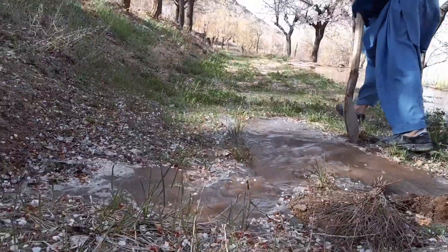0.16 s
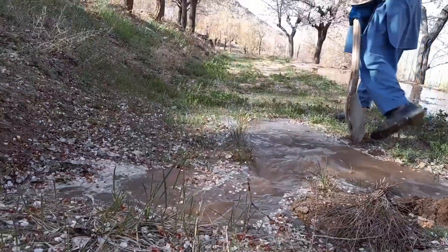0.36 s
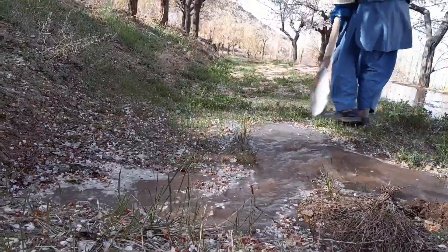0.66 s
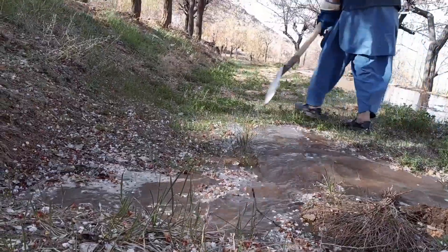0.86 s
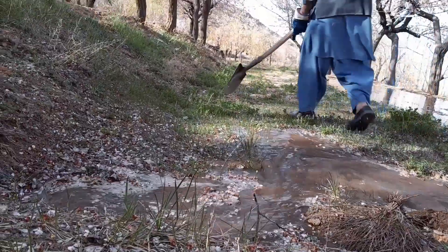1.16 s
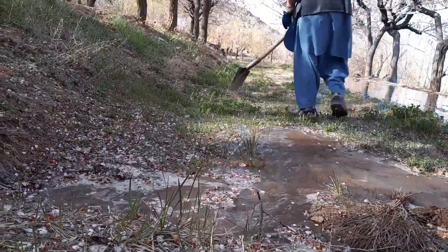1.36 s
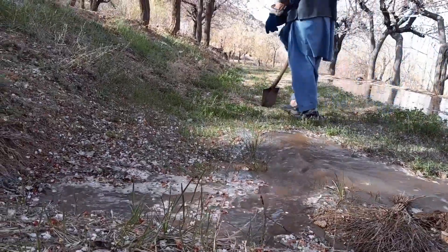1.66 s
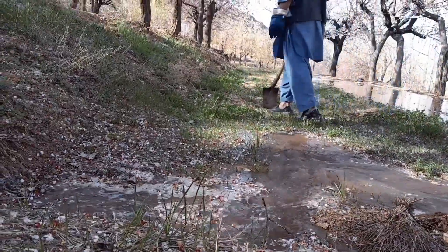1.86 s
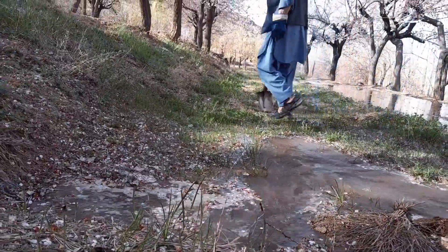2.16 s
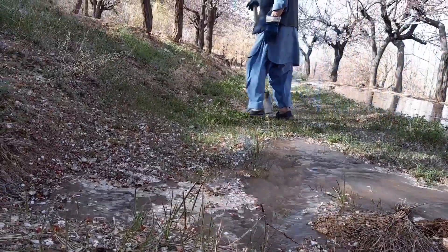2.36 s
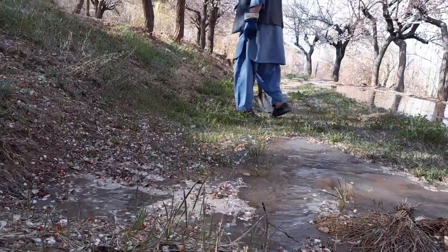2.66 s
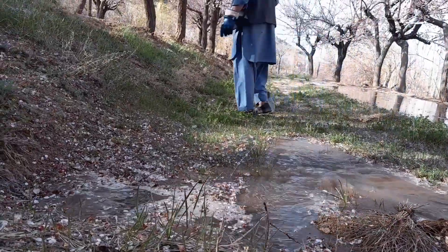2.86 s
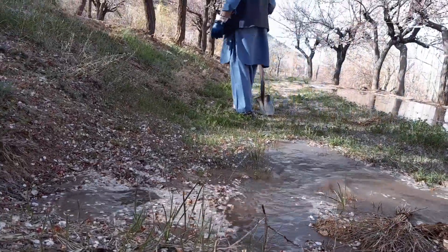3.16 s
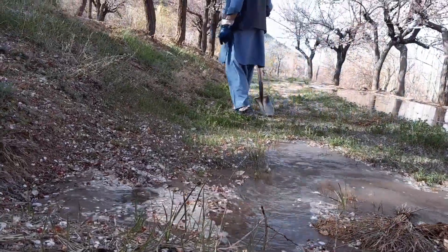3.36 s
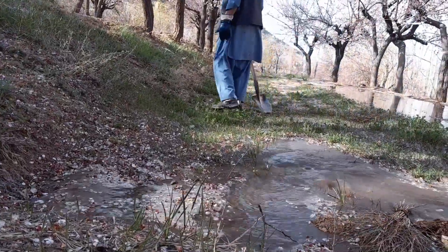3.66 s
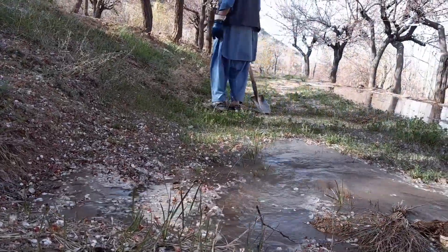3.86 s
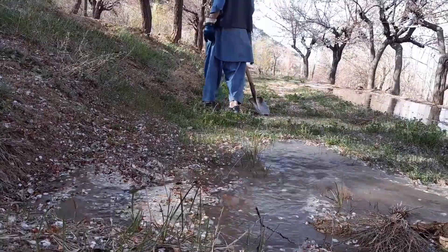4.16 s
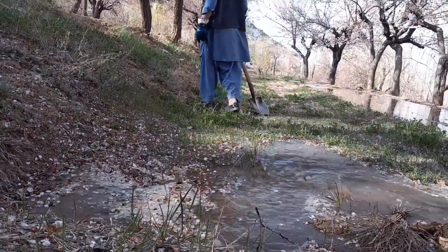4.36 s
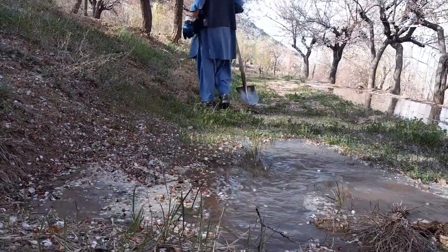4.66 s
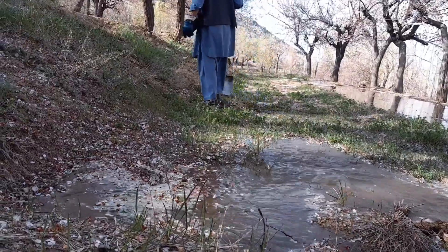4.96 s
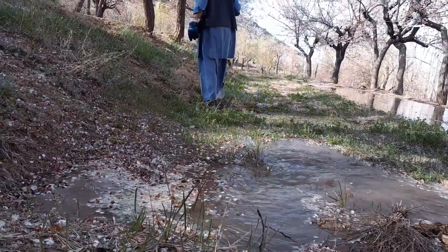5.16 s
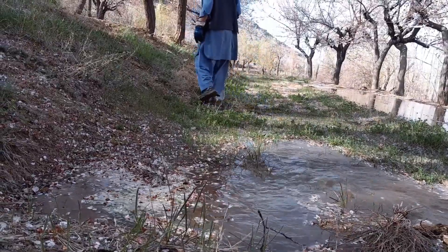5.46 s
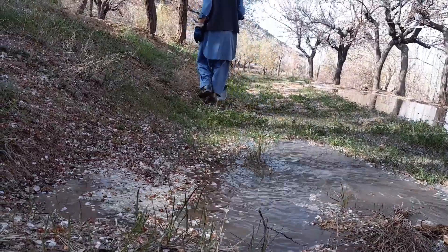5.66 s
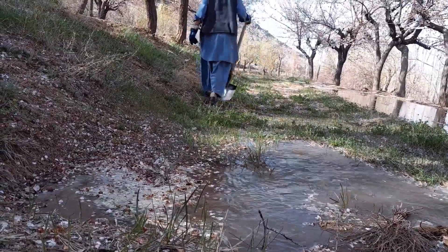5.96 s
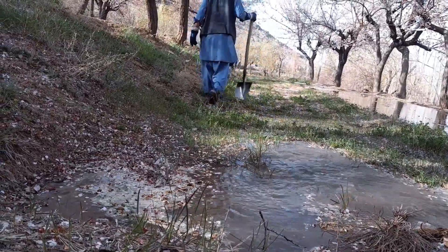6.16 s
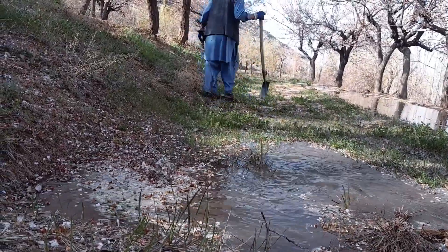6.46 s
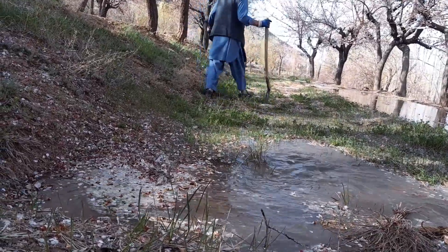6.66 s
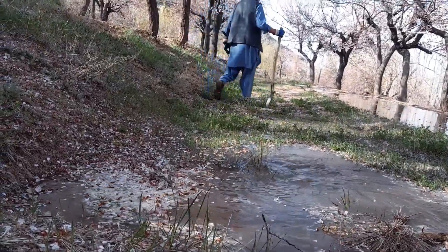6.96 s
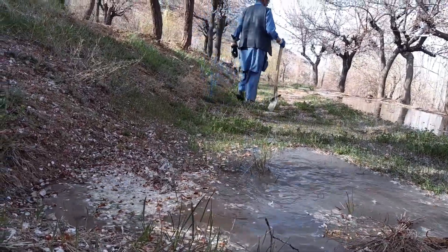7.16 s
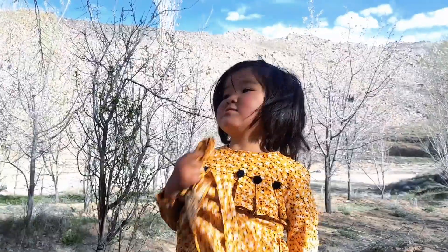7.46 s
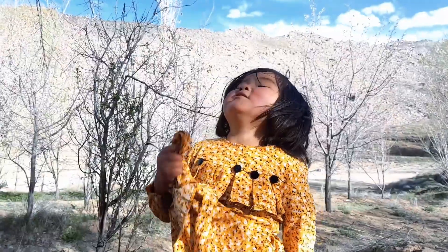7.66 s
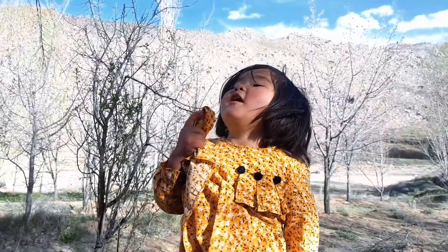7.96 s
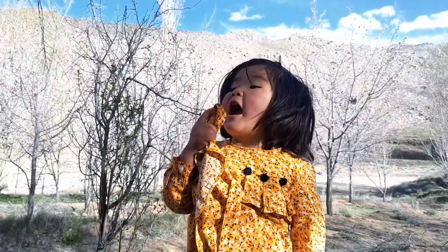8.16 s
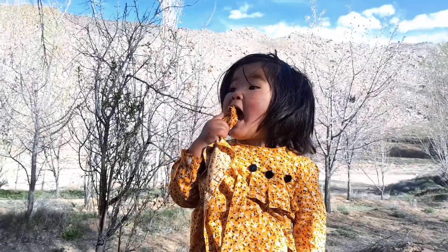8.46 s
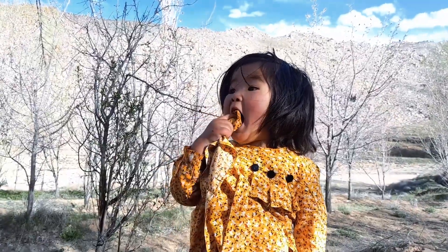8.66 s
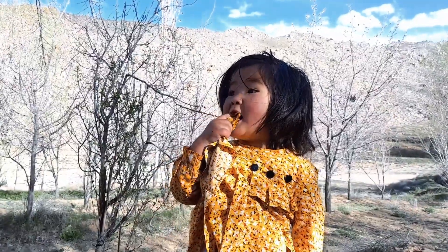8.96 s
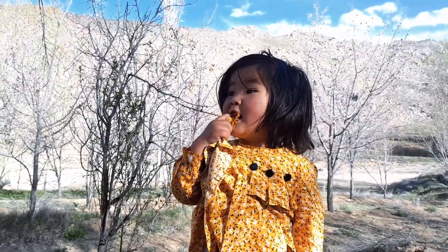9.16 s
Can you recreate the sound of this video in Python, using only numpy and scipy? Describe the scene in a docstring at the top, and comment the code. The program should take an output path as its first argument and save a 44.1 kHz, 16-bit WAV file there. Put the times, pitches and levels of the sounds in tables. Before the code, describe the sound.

Muddy irrigation water rushes and gurgles steadily with fizzing spray and small splashes, then cuts abruptly to a quiet breeze and faint hiss outdoors.

```python
"""A stream churns and glugs low down while spray and bursting bubbles fizz above, reaching the left port first.
It is irrigation water pouring through an opened ditch bank over leafy ground: ringing bubbles mixed with noise.
The scene then switches abruptly to a quiet orchard: a light breeze on the microphone and a thin hiss on the left.
The breeze is coloured noise with slow and random level changes, and its puffs are short dying throbs."""
import sys
import numpy as np
from scipy import signal
from scipy.fft import rfft, irfft
from scipy.io import wavfile

SR = 44100
rng = np.random.default_rng(int(sys.argv[2]) if len(sys.argv) > 2 else 0)


def wrap_up_sound(samples):
    """Save the sound to the file named by the first command line argument, as 16-bit audio."""
    columns = np.atleast_2d(samples).T
    # keep every value between -1 and 1, then stretch to whole-number steps
    tamed = np.clip(columns, -1, 1)
    steps = np.round(tamed * 32767).astype(np.int16)
    wavfile.write(sys.argv[1], SR, steps)


N = 410571
HZ = np.fft.rfftfreq(N, 1 / SR)
T = np.arange(N) / SR  # seconds

# the nearly steady flow of water, which only drifts: time_s, strength_db
FLOW_DRIFT = [(0, -0.5), (.2, -0.5), (.6, 0), (1.1, 0.36), (1.9, -0.2), (2.3, 0.1), (3.2, -0.5),
              (3.45, 0.5), (3.75, 0.7), (4.5, 0.5), (4.75, 0.25), (5.7, 0), (6.3, 0.3), (6.5, 1.4),
              (6.8, 1.5), (7.15, -0.3)]
# relative spectrum of the finest droplets and of slaps on the surface: frequency_hz, density_db (per Hz)
DROPLET_SPECTRUM = [(1500, -27), (4000, -7), (7500, 5), (9800, -0.5), (11000, 0), (13000, -1.5),
                    (15300, -12)]


def churn(gain_db=-33.5, follows_flow=0.84, follows_surge=0.3, lumpy_db=-0.4):
    """Air entrainment: water tumbling through the gap folds in large pockets of air, which ring low."""
    # relative spectrum of the deep churn: frequency_hz, density_db (per Hz)
    spectrum = [(20, -30), (45, -7.5), (62, 1), (90, -2), (130, 1.5), (165, 0), (210, -5.5), (290, -15.5),
                (500, -56)]
    glugs = bubbles(low_hz=80.0, high_hz=301, per_s=120, cycles=2.97, rise=0.049, spread_db=-0.5, count=12)
    froth = frothing(glugs, bubble_db=-17.5)
    body = evened(coloured(froth, read(spectrum)))
    drift_db = follows_flow * curve(FLOW_DRIFT) + follows_surge * surge_db()
    return amp(gain_db + drift_db + lumpy_db * wander(rate_hz=36)) * body


def gurgle(gain_db=-33.0, follows_surge=0.37, lumpy_db=0.78):
    """Bubble resonance: smaller pockets burble at higher pitches where the stream spreads out."""
    # relative spectrum of the burble: frequency_hz, density_db (per Hz)
    spectrum = [(130, -23), (200, 0.5), (250, -1), (310, -2), (370, 1.2), (420, -3), (480, -6.5),
                (620, -7.5), (700, -9.8), (790, -14.5), (930, -10), (1070, -15), (1240, -10), (1420, -18.5),
                (2400, -46)]
    glugs = bubbles(low_hz=218.1, high_hz=1114, per_s=500, cycles=7.1, rise=0.035, spread_db=1.5, count=18)
    froth = patchy(frothing(glugs, bubble_db=-8.5), depth_db=0.5, wide_hz=150, long_s=0.19)
    body = evened(coloured(froth, read(spectrum)))
    return amp(gain_db + follows_surge * surge_db() + lumpy_db * wander(rate_hz=21)) * body


def surge_db():
    """Superposed sloshes: each rolls through the gap as a smooth hump of level, or leaves a lull behind it."""
    # sloshes and lulls: middle_s, change_db
    sloshes = [(.35, 6.5), (.53, -3.5), (.76, 5), (1.24, 0), (1.45, -3.5), (1.78, -1), (2.04, -0.5),
               (2.3, 5), (2.59, -2), (3.8, 5), (4.5, 4), (4.95, -6), (5.13, 3), (5.44, 2), (5.57, -4.5),
               (5.9, 2), (6.12, -4), (6.6, 3.5)]
    half_s = 0.08  # from the middle to 1/e of the change
    return sum(db * np.exp(-((T - s) / half_s) ** 2) for s, db in sloshes)


def spray(gain_db=-33.0, spurt_db=0.84, swell_db=0.24, tinkle_db=-12):
    """Bursting bubbles: tiny ones spurt where water breaks over stones and twigs; a few ring longer."""
    pops = bubbles(low_hz=1292, high_hz=13800, per_s=3500, cycles=3.7, rise=0.037, spread_db=2.5, count=22)
    froth = frothing(pops, bubble_db=-4.0) + amp(tinkle_db) * tinkles()
    froth = patchy(froth, depth_db=1.05, wide_hz=700, long_s=0.022)
    swell = wander(rate_hz=10.7)
    level_db = gain_db + curve(FLOW_DRIFT) + spurt_db * wander(rate_hz=43) + swell_db * swell
    return amp(level_db) * evened(coloured(froth, spray_colour())) + prickle()


def spray_colour():
    """Cavity resonance: the microphone ports lift the spray's spectrum (in dB) around their modes."""
    # relative spectrum of the spray: frequency_hz, density_db (per Hz)
    spectrum = [(700, -41), (1000, -11), (1250, -4.5), (1700, -4), (2400, -3.5), (3200, -0.5), (5500, -1),
                (7600, 0.1), (8900, -12), (11000, -10.5), (12500, -14), (15300, -18)]
    # resonances of the microphone ports: frequency_hz, width_hz, lift_db
    port_modes = [(4290, 790, 5.5), (6630, 870, 5)]
    lift_db = sum(db / (1 + (2 * (HZ - hz) / width) ** 2) for hz, width, db in port_modes)
    return read(spectrum) + lift_db


def tinkles(low_hz=1100, high_hz=7000, per_s=170, cycles=20, rise=0.0246, spread_db=5):
    """Lightly damped bubbles: each rings long on its own pitch, rising as it nears the surface."""
    out = np.zeros((3, N))
    for place, when, pitch, size in rng.random((int(3 * per_s * N / SR), 4)):
        hz = low_hz * (high_hz / low_hz) ** pitch
        age = np.arange(0, 4, hz / (cycles * SR))  # in decay times
        ring = np.exp(-age) * np.sin(2 * np.pi * cycles * (age + rise * age ** 2 / 2))
        ring *= np.sqrt(hz) * amp(spread_db * size)
        part = out[int(place * len(out)), int(when * N):][:len(age)]  # a view into out
        part += ring[:len(part)]
    return evened(out)


def prickle(gain_db=-49.0, follows_flow=0.8, shower_db=3.5):
    """Impact ringing: fine droplets fall back in brief showers, each with a short high ring."""
    ticks = bubbles(low_hz=6600, high_hz=15000, per_s=2000, cycles=4.2, rise=0, spread_db=3.0, count=6)
    body = evened(coloured(ticks, read(DROPLET_SPECTRUM)))
    return amp(gain_db + follows_flow * curve(FLOW_DRIFT) + shower_db * wander(rate_hz=22)) * body


def gulps(gain_db=-6):
    """Volume pulsation: a large air pocket collapses and throbs for a few damped cycles."""
    # large air pockets, level before gain_db: start_s, level_db, pitch_hz
    pockets = [(.34, -17.5, 378), (.69, -16, 151), (.815, -18, 355), (1.187, -17, 370), (1.21, -16, 147),
               (1.214, -22, 594), (1.303, -15, 145), (1.58, -17, 75), (1.922, -14, 108),
               (2.193, -14.5, 154), (2.297, -16.5, 148), (2.318, -21.5, 552), (2.483, -18.5, 332),
               (3.348, -19.5, 347), (3.602, -16, 149), (3.809, -17.5, 156), (3.817, -22, 370),
               (4.263, -20, 390), (4.497, -12.5, 158), (5.373, -16, 115), (5.483, -20, 354),
               (5.703, -14.5, 136), (5.907, -13.5, 156), (6.396, -20.5, 398), (6.582, -17, 128),
               (6.587, -18.5, 328), (6.919, -16, 136)]
    return amp(gain_db) * throbs(pockets, decay_s=0.0052)


def splashes(slap_s=0.003, ring_db=-1, slap_db=-20):
    """Impact and resonance: a near drop slaps the surface and its bubble pings; a spatter is many slaps."""
    # single near drops, level before ring_db or slap_db: start_s, level_db, pitch_hz
    near_drops = [(0.049, -18.5, 6400), (0.6185, -24, 6600), (1.0211, -29, 4190), (1.062, -22, 6600),
                  (2.0093, -23, 6820), (2.1929, -21, 6310), (2.4687, -23, 4560), (4.4019, -24, 6700),
                  (4.6478, -26, 6750), (6.4647, -22, 6600), (6.566, -25, 6600)]
    # brief bright spatters: start_s, level_db, decay_s
    bright_spatters = [(1.249, -35, .002), (1.531, -33, 0.0046), (1.776, -39, .012), (2.1928, -31, .0014),
                       (3.572, -38, 0.0028), (3.637, -39, .003), (3.9803, -31, .001), (4.119, -36, .004),
                       (4.475, -34, .004), (5.783, -36, .003), (6.66, -36, .007)]
    slaps = sum(amp(db + slap_db) * pulse(s, slap_s) for s, db, _ in near_drops)
    spatters = sum(amp(db) * pulse(s, decay_s) for s, db, decay_s in bright_spatters)
    fizz = evened(coloured(rng.standard_normal(N), read(DROPLET_SPECTRUM)))
    pings = amp(ring_db) * throbs(near_drops, decay_s=0.00089)
    return pings + (slaps + spatters) * fizz


def stream():
    """Spatial coherence: the wide flow is diffuse, while single gulps and splashes come from one spot."""
    # likeness of the wide water at the two ports: frequency_hz, likeness (0-1)
    likeness = [(25, .35), (60, .76), (130, .96), (370, .99), (1100, .9), (1600, .7), (2000, .84),
                (3600, .67), (4250, .85), (5100, .56), (10000, .55), (15000, .2)]
    # level difference of the water: frequency_hz, left_minus_right_db
    left_excess = [(60, 0), (310, 2.6), (780, .5), (1100, 2.7), (2800, 2.7), (3950, -1.6), (5200, 1.6),
                   (6900, -.8), (7900, 1.5), (11000, -1.5)]
    # added phase lag at the right port, as sound bends around the housing: frequency_hz, lag_rad
    housing_bend = [(280, .05), (400, -.2), (650, -.1), (800, .65), (1000, .1), (1300, -.15), (2000, .6),
                    (2500, -.45), (3000, -.1), (3500, -.75), (4000, .25), (4900, .8), (5700, -.55),
                    (6600, 0), (7600, 1.2), (9200, -.1)]
    lag_ms = 0.454  # right after left
    left_db, bend = read(left_excess), read(housing_bend)
    wide = ports(churn() + gurgle() + spray(), read(likeness), left_db, lag_ms, bend)
    single = np.array([gulps() + splashes()] * 3)
    return wide + ports(single, 1, left_db, lag_ms, bend)


def orchard(buffet_db=-45.0, air_db=-40, hiss_db=-41, hiss_right_db=-31, gusty_db=2.5,
            flicker_db=1.14, buffet_follows=1.2, hiss_follows=0.61):
    """Wind noise: a breeze buffets each port over a soft rumble of air; a thin hiss on the left rises with it."""
    # relative spectra of buffeting, air rumble and hiss: frequency_hz, density_db (per Hz)
    spectra = [(18, -26), (35, -8), (62, 17), (90, 2), (140, 5), (300, -65)], [(50, -13), (100, 0.5), (150, 0.5), (220, -7.5), (300, -13), (430, -19.5),
                               (570, -16.5), (800, -28), (1100, -30), (1600, -40), (2000, -36), (2800, -41),
                               (5000, -76)], [(400, -2), (750, -2), (1100, 1.5), (1650, 2), (2200, -4.5),
                                            (2900, -2.5), (4000, -6), (6500, -7.5), (8200, -5.5),
                                            (8900, -15), (15300, -16)]
    # the breeze, which picks up overall: time_s, strength_db
    breeze_strength = [(7.2, -3), (7.4, -2.5), (7.9, 0), (8.25, 0.5), (8.6, 0), (8.95, 2), (9.18, 0.3),
                       (9.31, 0.5)]
    lag_ms = 0.32  # right after left
    breeze_db = curve(breeze_strength)
    buffet, air, hiss = (evened(coloured(rng.standard_normal((3, N)), read(s))) for s in spectra)
    buffet = buffet * amp(buffet_db + buffet_follows * breeze_db + gusty_db * wander(rate_hz=11))
    buffet = ports(buffet, same=0.35, left_db=5.5, lag_ms=lag_ms)
    air = ports(air * amp(air_db + breeze_db), same=0.92, left_db=2.8, lag_ms=lag_ms)
    hiss = hiss[:2] * amp(hiss_db + hiss_follows * breeze_db + flicker_db * wander(rate_hz=53))
    return buffet + air + puffs() + hiss * amp([[0], [hiss_right_db]])


def puffs():
    """Pressure pulses: each gust thumps one port of the microphone harder than the other."""
    # gusts, level midway between the ports in dB: start_s, level_db, pitch_hz, left_minus_right_db
    gusts = [(7.855, -32, 67, 4), (8.2, -32, 72, -7), (8.875, -30, 126, 5), (8.985, -32, 68, 4),
             (9.213, -28, 66, 16)]
    return sum(throbs([(s, db, hz)], decay_s=0.0096) * amp([[left_db / 2], [-left_db / 2]])
               for s, db, hz, left_db in gusts)


def bubbles(low_hz, high_hz, per_s, cycles, rise, spread_db, count=28):
    """Damped resonance: swarms of bubbles ring for a few cycles, any pitch rise coming near the surface."""
    out = np.zeros((3, N))
    for hz in np.geomspace(low_hz, high_hz, count):
        age = np.arange(0, 5, hz / (cycles * SR))  # in decay times, each of the given cycles
        ring = np.sin(2 * np.pi * cycles * (age + rise * age ** 2 / 2)) * np.exp(-age)
        chance, size = rng.random((3, N), dtype=np.float32), np.zeros((3, N))
        born = chance < per_s / count / SR
        rarity = -np.log(chance[born] * count * SR / per_s + .01)
        size[born] = amp(spread_db * rarity)
        swarm = signal.oaconvolve(size, np.diff(ring)[None], axes=1)[:, :N]
        out += np.sqrt(hz) * evened(swarm)
    return evened(out)


def frothing(swarm, bubble_db):
    """Statistical masking: separate bubbles over the noise wash of those too many to tell apart."""
    return evened(rng.standard_normal((3, N)) + amp(bubble_db) * swarm)


def patchy(x, depth_db, wide_hz, long_s):
    """Time-frequency modulation: random patches of the spectrum swell and fade, each on its own."""
    hz, s, z = signal.stft(x, SR, nperseg=1024, noverlap=768)
    along_hz = np.fft.fftfreq(len(hz), hz[1])[:, None]
    along_s = np.fft.fftfreq(len(s), s[1])
    blur = np.exp(-(along_hz * wide_hz) ** 2 - (along_s * long_s) ** 2)
    patches = np.fft.ifft2(np.fft.fft2(rng.standard_normal(blur.shape)) * blur).real
    shaped = z * amp(depth_db * evened(patches))
    return signal.istft(shaped, SR, nperseg=1024, noverlap=768)[1][:, :N]


def throbs(rows, decay_s):
    """Damped oscillation: a few dying cycles for each row (start_s, level_db, pitch_hz)."""
    return sum(amp(db) * pulse(s, decay_s) * np.sin(2 * np.pi * hz * (T - s)) for s, db, hz, *_ in rows)


def pulse(s, decay_s):
    """Critically damped response: starts at s, rises to 1 after decay_s and dies away."""
    age = np.clip((T - s) / decay_s, 0, 50)
    return age * np.exp(1 - age)


def ports(sound, same, left_db, lag_ms, bend=0):
    """Partial coherence: the first of three like signals reaches both ports, right later; the others one each."""
    z, same = rfft(sound), np.clip(same, 0, 1)
    left, right = np.sqrt(same) * z[0] + np.sqrt(1 - same) * z[1:]
    late = np.exp(-1j * (2 * np.pi * HZ * lag_ms / 1000 + bend))
    return irfft(np.array([left * amp(left_db / 2), right * late * amp(-left_db / 2)]), N)


def wander(rate_hz):
    """Low-passed noise: random motion of rms 1, mostly slower than the rate."""
    return evened(irfft(rfft(rng.standard_normal(N)) * (HZ > 2) / (1 + (HZ / rate_hz) ** 2), N))


def coloured(x, db):
    """Linear filtering: applies a gain in dB at every frequency."""
    return irfft(rfft(x) * amp(db), N)


def read(points):
    """Log-frequency interpolation: reads a table at every frequency."""
    hz, value = np.transpose(points)
    return np.interp(np.log(HZ + 1), np.log(hz + 1), value)


def curve(points):
    """Linear interpolation: reads a table over time at every sample."""
    return np.interp(T, *np.transpose(points))


def evened(x):
    """Power normalisation: scales to rms 1."""
    return x / np.sqrt(np.mean(x ** 2) + 1e-20)


def amp(db):
    """Logarithmic level: decibels to amplitude gain."""
    return 10 ** (np.asarray(db) / 20)


def scene(cut_s=7.168):
    """Linear crossfade: the water, then an abrupt switch to the orchard."""
    by_water = np.clip((cut_s - T) / .004 + .5, 0, 1)  # a 4 ms switch
    return by_water * stream() + (1 - by_water) * orchard()


def record(dry, edge_hz=15500):
    """Band limiting: the recorder's linear-phase low-pass filter."""
    low_pass = signal.firwin(511, edge_hz, window=("kaiser", 9), fs=SR)
    return signal.oaconvolve(dry, low_pass[None], "same")


dry = scene()
out = record(dry)
wrap_up_sound(out)
```